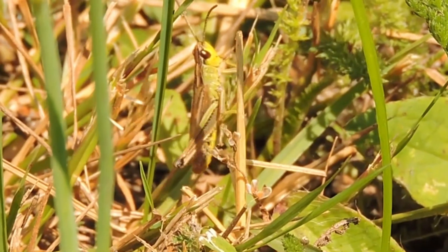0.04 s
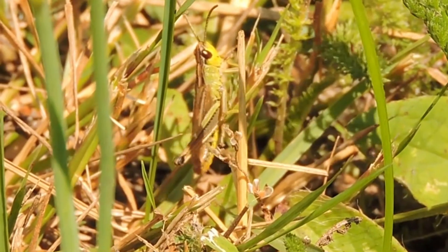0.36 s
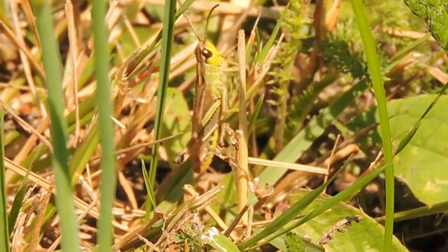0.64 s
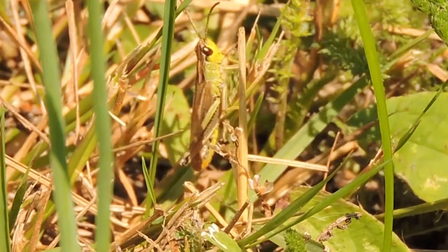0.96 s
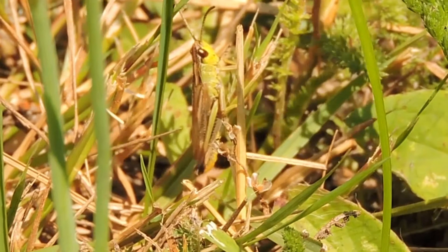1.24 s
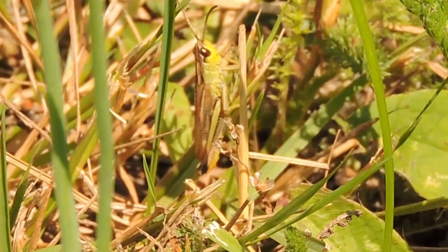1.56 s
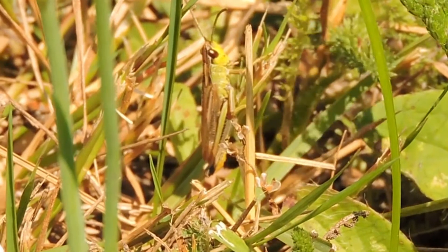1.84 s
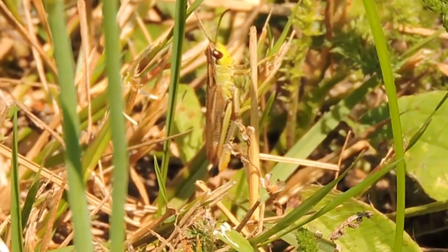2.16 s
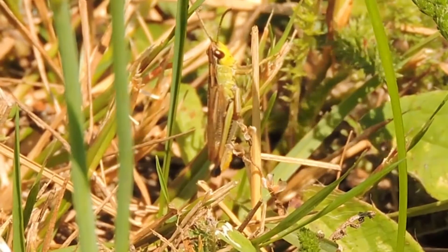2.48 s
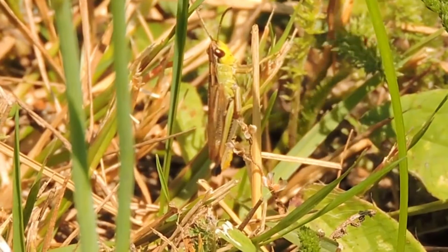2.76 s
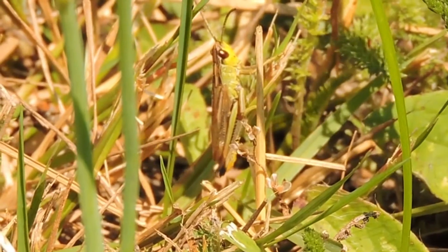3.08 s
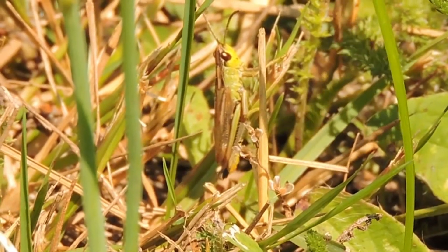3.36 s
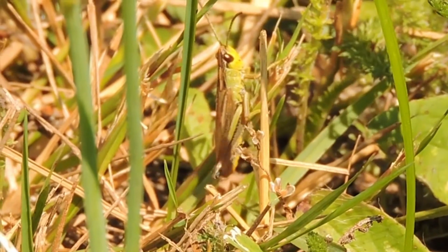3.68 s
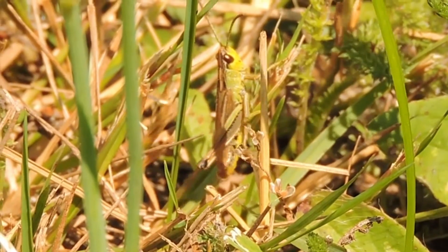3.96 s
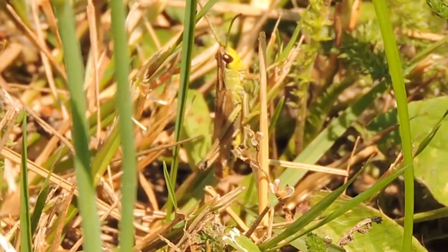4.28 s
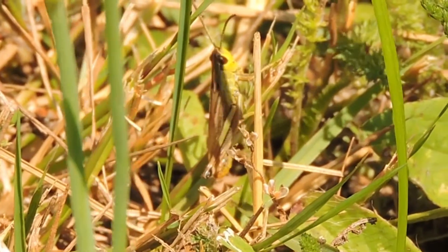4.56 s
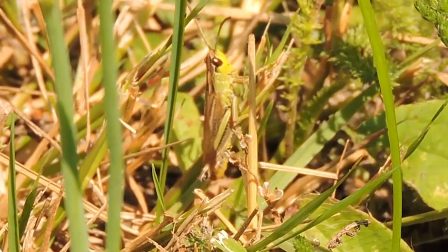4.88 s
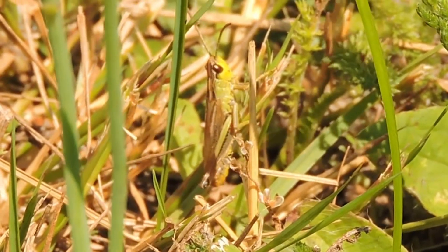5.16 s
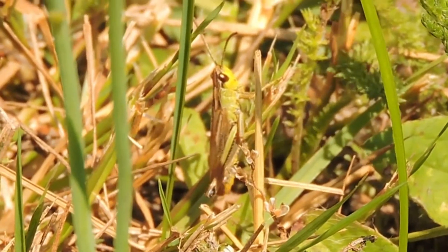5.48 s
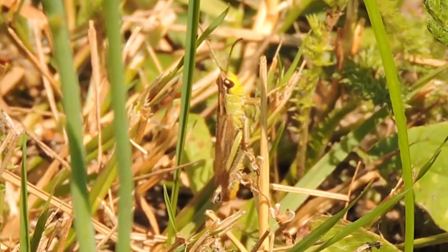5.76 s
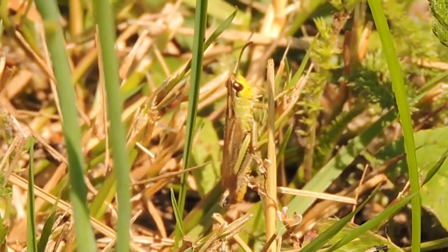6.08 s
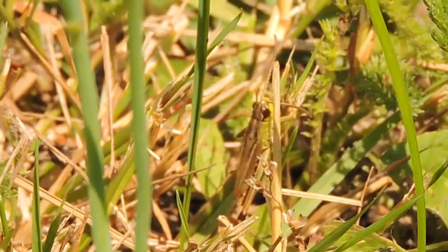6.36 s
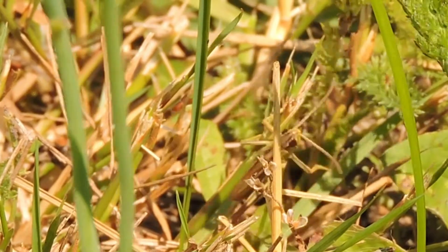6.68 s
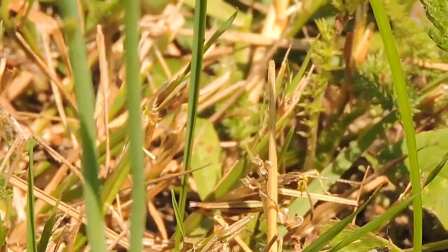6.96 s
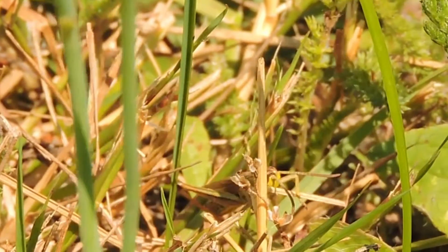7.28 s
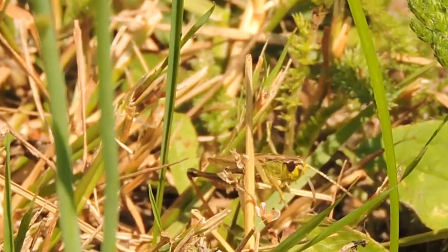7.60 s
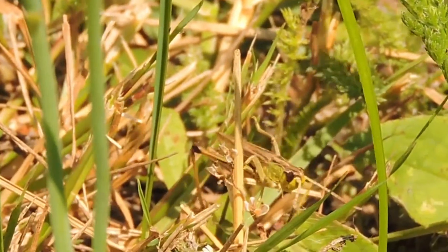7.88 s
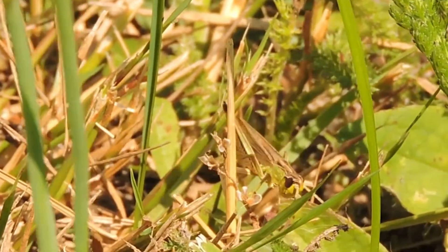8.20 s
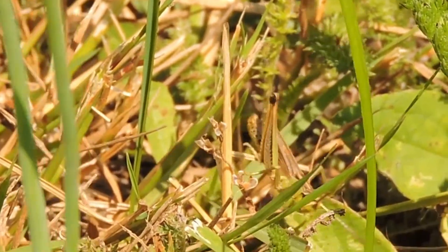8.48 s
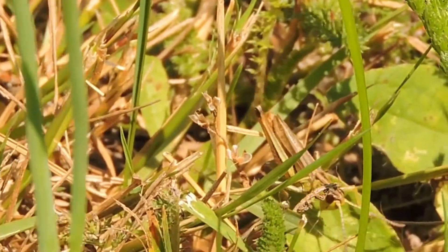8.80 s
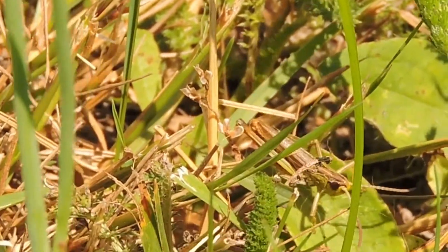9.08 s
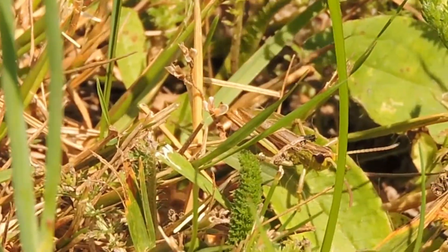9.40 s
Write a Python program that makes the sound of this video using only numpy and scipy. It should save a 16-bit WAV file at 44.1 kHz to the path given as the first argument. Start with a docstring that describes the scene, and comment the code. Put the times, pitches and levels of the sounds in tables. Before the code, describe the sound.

A grasshopper scrapes two short, high, raspy verses in a meadow, with faint distant birds and wind gusts thumping the microphone.

```python
"""A meadow, one microphone down in the grass: hiss all round, a low murmur far off, a puff of wind.
Close by, a grasshopper sings a one-second verse, scraping the pegs of its hind legs over its wings,
while birds call in the distance. Near 3.6 s the wind gets up and the second verse follows; eddies
thump the microphone and a strong gust knocks it. The grasshopper stops, a far bird trills at 5.6 s,
and gusts buffet the microphone more and more."""
import sys
import numpy as np
from scipy import signal
from scipy.fft import rfft, irfft, next_fast_len
from scipy.io import wavfile
from scipy.ndimage import uniform_filter1d, map_coordinates

SR = 44100
rng = np.random.default_rng(int(sys.argv[2]) if len(sys.argv) > 2 else 0)


def output_pcm(signal):
    """Save a mono or channel-first signal as 16-bit PCM at the path in sys.argv[1].

    Samples are clipped to [-1, 1] before scaling.
    """
    pcm = np.clip(np.atleast_2d(signal).T, -1, 1) * 32767
    wavfile.write(sys.argv[1], SR, np.round(pcm).astype(np.int16))


N = 416304

# leg strokes: end t/s, downstroke length/s, catches, last catch level/dB, its f/Hz, rasp level/dB
LEG_STROKES = [(.0954, 0.034, 4, -19.5, 11800, -57), (.2014, .044, 5, -22, 11400, -53.5),
               (.277, .017, 4, -25, 10400, -52), (0.382, 0.019, 2, -18.5, 10000, -52.5),
               (0.4952, .033, 4, -16, 11300, -53), (.587, 0.045, 6, -16.5, 11700, -53),
               (0.6877, 0.038, 5, -14, 12500, -50), (.7812, 0.048, 7, -13.5, 12100, -53),
               (.879, 0.048, 8, -15, 11200, -52.5), (.967, 0.035, 7, -15, 11400, -52.5),
               (3.6934, 0.014, 2, -28, 11300, -56), (3.7914, 0.026, 3, -24, 11300, -55),
               (3.879, .028, 3, -23, 11200, -53), (3.9758, .018, 3, -22, 10400, -55),
               (4.078, 0.027, 4, -19.5, 10600, -55), (4.1753, .015, 2, -20.5, 10800, -57),
               (4.3035, 0.043, 5, -15, 11300, -50.5), (4.4045, 0.042, 7, -15, 11500, -51)]
# eddies hitting the microphone port: t/s, peak level/dB, f/Hz
EDDIES = [(4.078, -21.5, 189), (4.097, -8, 71), (4.11, -14, 178), (4.16, -15, 130), (4.238, -3, 76),
          (4.233, -18.5, 189), (4.617, -24, 120), (5.692, -8, 109), (5.875, -23.5, 166),
          (6.051, -14.5, 170), (6.291, -25, 118), (6.41, -27, 130), (7.502, -11, 50.5), (7.578, -11.5, 83),
          (7.696, -13.5, 135), (7.699, -22, 233), (8.189, -11.5, 118), (8.304, -16, 146), (8.449, -22, 139),
          (8.677, -16.5, 98), (8.769, -15.5, 114), (9.101, -16, 81), (9.38, -23.5, 126)]


def amp(db):
    """Decibels to gain."""
    return 10 ** (np.asarray(db) / 20)


def unit(x):
    """Scale to rms 1."""
    return x / np.sqrt(np.mean(x ** 2) + 1e-20)


def curve(rows):
    """Rows of t/s, value as one value per sample."""
    return np.interp(np.arange(N) / SR, *np.transpose(rows))


def wobble(rate):
    """A smooth random curve, rate knots a second."""
    return map_coordinates(rng.standard_normal(int(N * rate / SR) + 4), [np.arange(N) * rate / SR])


def filtered(x, response):
    """Filter x by a gain given as a function of frequency."""
    size = next_fast_len(N + SR // 2)
    return irfft(rfft(x, size) * response(np.fft.rfftfreq(size, 1 / SR)), size)[:N]


def noise(spectrum):
    """Noise of rms 1 coloured by rows of f/Hz, relative level/dB."""
    f, db = np.transpose(spectrum)
    white = rng.standard_normal(N)
    return unit(filtered(white, lambda hz: amp(np.interp(np.log(hz + 1), np.log(f), db))))


def steadied(x, span):
    """Even out the swells of a noise that are slower than span seconds."""
    return x / np.sqrt(np.abs(uniform_filter1d(x ** 2, int(span * SR) + 1)) + 1e-6)


def add(track, s, sound):
    """Mix a sound into the track at s seconds."""
    start = max(round(s * SR), 0)
    track[start:start + len(sound)] += sound[:max(N - start, 0)]


def meadow(murmur_db=-42.5, fade_db_per_s=0.21, waver_db=1.0):
    """Grass hisses round the microphone over a far murmur; both dip briefly in level now and then."""
    # spectra of the grass and the murmur: f/Hz, relative level/dB
    hiss_spectrum = [(200, 1.5), (1000, -0.5), (1600, 1), (2500, -0.5), (4000, -1.5), (5500, -5),
                     (8000, -7), (10500, -9.5), (13000, -12.5), (15000, -14.5), (15800, -25)]
    murmur_spectrum = [(30, -5.5), (70, 8.5), (160, 8.5), (240, 3), (330, -1.5), (500, -7), (680, -7),
                       (850, -0.5), (1100, -5), (1400, -11), (2200, -21.5), (5000, -41)]
    # the hiss, dips aside: t/s, level/dB
    hiss_levels = [(0, -46), (1.9, -49.3), (3.5, -48.5), (4.8, -46.5), (5.6, -46.5), (6.4, -48), (7, -47.5),
                   (7.4, -50.3), (9.44, -49.5)]
    # dips in the background: t/s, half width/s, depth/dB
    dips = [(5.76, 0.02, 6.5), (5.89, .1, 6), (7.16, 0.035, 3), (8.09, 0.033, 3)]
    t = np.arange(N) / SR
    dip_db = sum(depth * np.exp(-((t - s) / width) ** 2) for s, width, depth in dips)
    hiss = amp(curve(hiss_levels)) * noise(hiss_spectrum)
    murmur = amp(murmur_db - fade_db_per_s * t + waver_db * wobble(4.9)) * noise(murmur_spectrum)
    return amp(-dip_db) * (hiss + murmur)


def gust(arrival, hold, rise_s=0.05, fall_s=0.06):
    """A gust's strength, 0-1: it builds, holds and dies away."""
    t = np.arange(N) / SR
    return np.exp(np.minimum(t - arrival, 0) / rise_s - np.maximum(t - arrival - hold, 0) / fall_s)


def wind(flutter_power=1.96, buffet_lumps_db=2.0, flutter_lumps_db=4.0, wake_db=-13, wake_s=0.02):
    """Slow pressure swings buffet the microphone; gusts and eddies add faster flutter, all in lumps."""
    # buffet between gusts: t/s, level/dB
    breeze = [(0, -35.5), (1.2, -42), (2.9, -44.5), (3.6, -33.5), (5.2, -37.5), (6.8, -32), (9.44, -30)]
    # gusts: arrival t/s, hold/s, buffet level/dB, flutter level/dB
    gusts = [(0, 0.22, -31.5, -40.5), (3.585, 0.063, -24.5, -48), (3.88, 0.047, -24, -43),
             (4.05, 0.083, -17.5, -33), (4.216, 0.071, -15.5, -30), (4.474, 0.053, -26.5, -41),
             (4.686, 0.27, -24, -43.5), (5.436, 0.12, -28.5, -39.5), (5.629, 0.19, -18, -28.5),
             (5.91, 0.41, -22.5, -30.5), (6.27, 0.3, -25, -37.5), (6.94, 0.22, -26.5, -46),
             (7.268, 0.16, -23.5, -38), (7.502, 0.26, -20.5, -29), (7.924, .05, -24, -36.5),
             (8.147, 0.33, -18.5, -27), (8.524, 0.32, -22.5, -37), (8.88, 0.23, -22, -34),
             (9.28, .12, -31, -48)]
    # spectra of the wind on the microphone: f/Hz, relative level/dB
    buffet_spectrum = [(10, 0.5), (18, 3.5), (30, 0), (50, -3), (75, -10), (120, -30.5), (200, -35.5),
                       (400, -87)]
    flutter_spectrum = [(35, 0), (65, 3.5), (100, 1.5), (150, -7), (210, -18.5), (300, -23), (400, -32),
                        (600, -57), (1200, -90)]
    push, shake = amp(curve(breeze)), np.zeros(N)
    for arrival, hold, buffet_db, flutter_db in gusts:
        strength = gust(arrival, hold)
        push = np.maximum(push, amp(buffet_db) * strength)
        shake = np.maximum(shake, amp(flutter_db) * strength ** flutter_power)
    t = np.arange(N) / SR
    for s, db, _ in EDDIES:
        wake = amp(db + wake_db) * np.exp(-((t - s) / wake_s) ** 2)
        shake = np.maximum(shake, wake)
    lumps = wobble(22)
    buffet = push * amp(buffet_lumps_db * lumps) * steadied(noise(buffet_spectrum), span=0.128)
    flutter = shake * amp(flutter_lumps_db * lumps) * steadied(noise(flutter_spectrum), span=0.054)
    return buffet + flutter


def peg_catches(slowing=1.2, swell_db_per_s=227, sharpen_hz_per_s=52000,
                jitter_s=0.0005, scatter_db=2.2, turn_hz=10500):
    """Pegs catching on the wing vein, as rows of t/s, level/dB, f/Hz."""
    # lone ticks as the leg turns round: t/s, level/dB
    turn_ticks = [(0.016, -21), (.1161, -29.5), (.3076, -20), (.4056, -23), (.5031, -24.5), (.9774, -22),
                  (3.8085, -28.5), (4.0014, -19.5), (4.1951, -21), (4.1998, -18), (4.4106, -21)]
    catches = [(s, db, turn_hz) for s, db in turn_ticks]
    for end, length, number, db, hz, _ in LEG_STROKES:
        # the downstroke slows as the leg presses harder: catches spread out, swell and sharpen
        leads = length * (1 - np.linspace(0, 1, number) ** slowing)
        for lead, (timing, size) in zip(leads, rng.standard_normal((len(leads), 2))):
            loose = lead > 0  # all but the last catch scatter
            catches.append((end - lead + loose * jitter_s * timing,
                            db - swell_db_per_s * lead + loose * scatter_db * size,
                            hz - sharpen_hz_per_s * lead))
    return catches


def peg_strikes(slip_gap_s=0.0012, slip_db=-2.5, hard_db=-13.5, softness=0.56, cycles=0.69, count=4):
    """Each catch lets go in a few snaps about a millisecond apart; hard catches slip on longer."""
    strikes = np.zeros(N)
    t = np.arange(-12, 13) / SR
    for s, db, hz in peg_catches():
        timing, size, detunes = rng.standard_normal((3, count))
        gaps = slip_gap_s * np.exp(0.22 * timing)
        fade_db = slip_db - softness * max(hard_db - db, 0)
        slips = amp(fade_db * np.arange(count) ** 1.5 + 3 * size)
        slips /= np.linalg.norm(slips)
        for at, slip, detune in zip(s + np.cumsum(gaps) - gaps[0], slips, detunes):
            turns = t * hz * np.exp(0.08 * detune - 0.07)
            snap = np.cos(2 * np.pi * turns) * np.exp(-0.5 * (turns / cycles) ** 2)
            add(strikes, at, amp(db) * slip * snap / np.linalg.norm(snap))
    return strikes


def leg_rasp(pegs_per_s=1600, lift_db=-4, press_db=-1.0, lift_hz=13000, press_hz=8000, spread_hz=4500,
             lift_lead_s=0.021, press_lead_s=0.0052):
    """Light pegs tick densely: thin and high while the leg lifts, then lower as it presses down."""
    t = np.arange(N) / SR
    rasp = np.zeros(N)
    for lead, width, level_db, centre_hz in [(lift_lead_s, 0.012, lift_db, lift_hz),
                                             (press_lead_s, 0.033, press_db, press_hz)]:
        force = sum(amp(db + level_db) * np.exp(-((t - end + length + lead) / width) ** 2)
                    for end, length, *_, db in LEG_STROKES)
        ticks = rng.standard_normal(N) * (rng.random(N) < pegs_per_s / SR)
        rasp += force * unit(filtered(ticks, lambda hz: np.exp(-((hz - centre_hz) / spread_hz) ** 2 / 2)))
    return rasp


def tick_ring(low_hz=5950, size=2048):
    """The bright, many-peaked ring that colours each tick, energy 1; it falls away below low_hz."""
    # peaks of the ring: f/Hz, width/Hz, relative level/dB
    peaks = [(6660, 1400, -1), (8030, 320, -5), (8700, 350, -2), (9100, 250, -8.5), (9600, 300, -3.5),
             (10070, 320, -0.5), (11000, 160, -1), (11800, 340, -1.5), (12500, 280, -13), (13500, 280, 5.5),
             (14300, 490, 6.5), (14900, 220, 2), (15550, 350, -4)]
    hz = np.fft.rfftfreq(size, 1 / SR)
    power = sum(amp(db) ** 2 / (1 + (2 * (hz - centre) / width) ** 2) for centre, width, db in peaks)
    gain = np.sqrt(power) / (1 + (low_hz / (hz + 1)) ** 10)
    # minimum phase, so the ring follows the tick
    cepstrum = irfft(np.log(gain / gain.max() + 0.0014))[:size // 2]
    ring = irfft(np.exp(rfft(np.r_[0, 2 * cepstrum[1:]], size)))
    return ring / np.linalg.norm(ring)


def grasshopper():
    """Close to the microphone, strikes and rasp share the same bright ring."""
    return signal.fftconvolve(peg_strikes() + leg_rasp(), tick_ring())[:N]


def whistle(length, start_hz, end_hz, rough, arch_rate=2.0):
    """A bird's glide, arched more the longer it lasts; a fast waver of the pitch makes it harsh."""
    u = np.linspace(0, 1, int(length * SR))
    waver = 0.075 * rough * map_coordinates(rng.standard_normal(100), [u * length * 550])
    arch = arch_rate * length * (np.sin(np.pi * u) - 0.5)
    pitch = (start_hz + (end_hz - start_hz) * u) * (1 + arch + waver)
    return np.sqrt(np.abs(np.sin(np.pi * u))) * np.sin(2 * np.pi * np.cumsum(pitch) / SR)


def bird_calls():
    """Small birds whistle single notes and chirrups; a larger one, farther off, holds an even pitch."""
    # single notes: t/s, length/s, start f/Hz, end f/Hz, level/dB, roughness
    notes = [(0.283, .085, 3650, 3420, -52.5, .5), (0.438, .03, 3000, 2880, -49.5, .3),
             (1.42, .047, 4400, 4080, -51, 0.83), (1.868, .046, 2950, 2580, -50, .5),
             (3.075, .02, 4400, 3700, -49, .7), (3.12, .032, 3550, 3930, -43.5, .4),
             (3.745, .053, 3450, 3700, -51, .66), (3.846, .022, 5800, 4870, -49, .7),
             (4.775, .04, 3000, 2750, -50, .4), (8.143, 0.012, 5400, 5120, -38, 0.9),
             (8.684, .028, 4300, 4700, -49.5, 1.1), (8.699, .035, 4020, 3830, -41.5, 0.24)]
    # the larger bird: t/s, length/s, f/Hz, level/dB
    far_calls = [(.635, .07, 1560, -50), (.93, 0.043, 1540, -48), (1.228, 0.097, 1590, -48.5)]
    # chirrups: t/s, f/Hz, level/dB, roughness
    chirrups = [(1.145, 3750, -52, 0.34), (3.425, 3680, -48, 0.54), (4.05, 3750, -52, 0.6),
                (4.47, 3990, -48.5, 0.9), (5.32, 3604, -45.5, 0.35), (7.908, 3590, -44, 0.15),
                (9.258, 3740, -44, 0.53)]
    # a chirrup's arch, drop and upsweep:
    # delay/s, length/s, start and end pitch ratios, relative level/dB, added roughness
    parts = [(0, .048, 1.02, 0.93, -0.5, 0.029), (.044, .012, 1.12, 0.77, -0.24, 0.23),
             (.058, .032, .8, .91, -1.9, 0.25)]
    song = np.zeros(N)
    for s, length, start_hz, end_hz, db, rough in notes:
        add(song, s, amp(db) * whistle(length, start_hz, end_hz, rough))
    for s, length, hz, db in far_calls:
        add(song, s, amp(db) * whistle(length, hz, hz, rough=0.32, arch_rate=0.23))
    for s, hz, db, rough in chirrups:
        for delay, length, first, last, part_db, harsher in parts:
            add(song, s + delay, amp(db + part_db) * whistle(length, first * hz, last * hz, rough + harsher))
    return song


def bird_trill(peak_s=5.70, low_db=-40, high_db=-42, low_db_per_s=20, high_db_per_s=130,
               high_lag_s=0.0097, count=7):
    """One bird trills upsweeps in two voices, swelling towards peak_s and fading after it."""
    # the trill: t/s, syllable period/s, low voice from and to f/Hz, high voice from and to f/Hz
    trill = (5.583, .0255, 3200, 3650, 3800, 4600)
    start, period, low_from, low_to, high_from, high_to = trill
    song = np.zeros(N)
    for s in start + period * np.arange(count):
        low = whistle(0.52 * period, low_from, low_to, rough=0.19)
        high = whistle(0.57 * period, high_from, high_to, rough=0.53)
        add(song, s, amp(low_db - low_db_per_s * abs(s - peak_s)) * low)
        add(song, s + high_lag_s, amp(high_db - high_db_per_s * abs(s - peak_s)) * high)
    return song


def distant_birds(echo_db=-5.5, echo_t60=0.12):
    """Trees scatter the birdsong on its way to the microphone."""
    song = bird_calls() + bird_trill()
    t = np.arange(SR // 2) / SR
    tail = rng.standard_normal(len(t)) * amp(-60 * t / echo_t60)
    return song + amp(echo_db) * signal.fftconvolve(song, tail / np.linalg.norm(tail))[:N]


def eddy_thumps(cycles=0.41):
    """Each eddy is one quick swing of pressure at the microphone port."""
    track = np.zeros(N)
    t = np.arange(-SR // 30, SR // 30) / SR
    for s, db, hz in EDDIES:
        swing = np.cos(2 * np.pi * hz * t) * np.exp(-0.5 * (hz * t / cycles) ** 2)
        add(track, s + t[0], amp(db) * swing)
    return track


def gust_knock(at_s=4.114, db=-8, rise_s=0.00028, recovery_s=0.005):
    """A strong gust knocks the microphone with a steep drop of pressure."""
    track = np.zeros(N)
    t = np.arange(-SR // 100, SR // 20) / SR
    drop = -0.5 * (1 + np.tanh(0.5 * t / rise_s))
    add(track, at_s + t[0], amp(db) * drop * np.exp(-np.maximum(t, 0) / recovery_s))
    return track


def scene():
    """Everything at one microphone in the grass."""
    return (grasshopper() + distant_birds() + meadow() + wind() + eddy_thumps() + gust_knock())[None]


def record(dry, top_hz=15850):
    """The camera keeps nothing above its band limit."""
    return filtered(dry[0], lambda hz: hz < top_hz)[None]


dry = scene()
out = record(dry)
output_pcm(out)
```